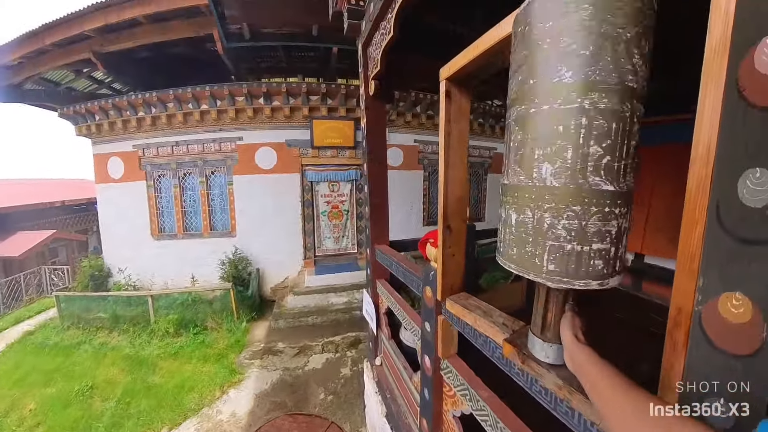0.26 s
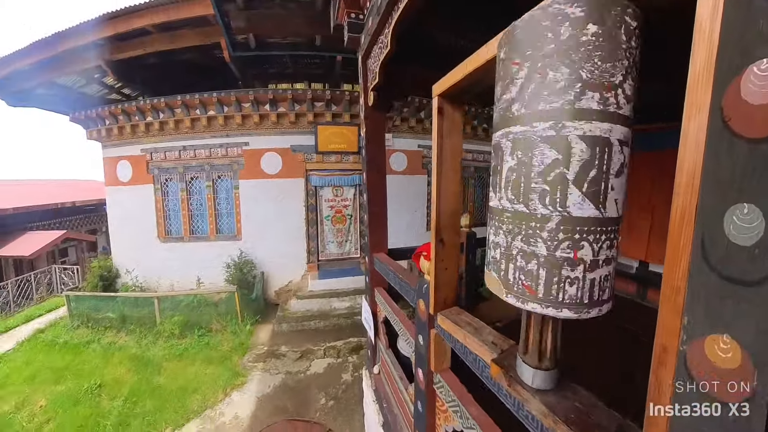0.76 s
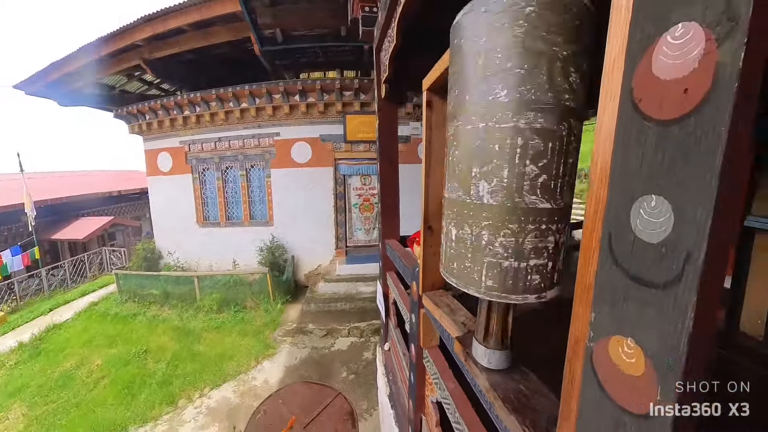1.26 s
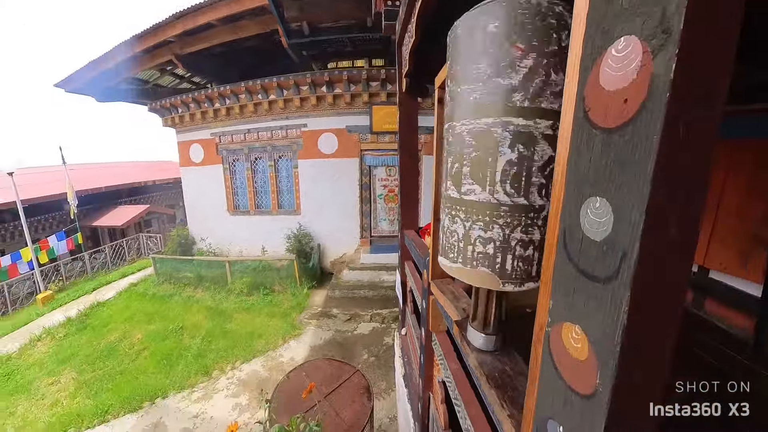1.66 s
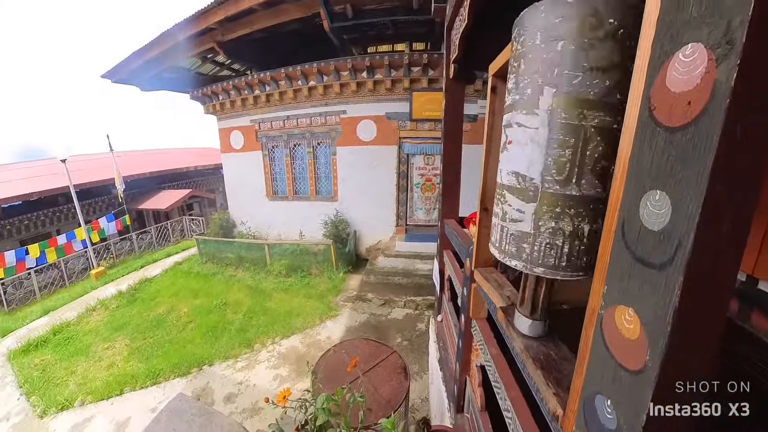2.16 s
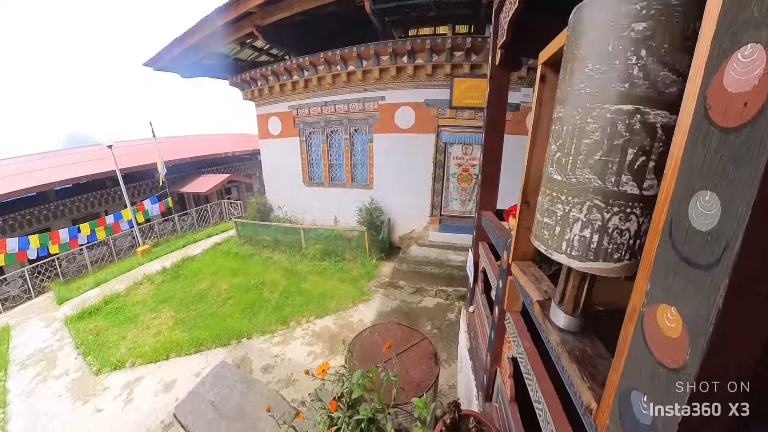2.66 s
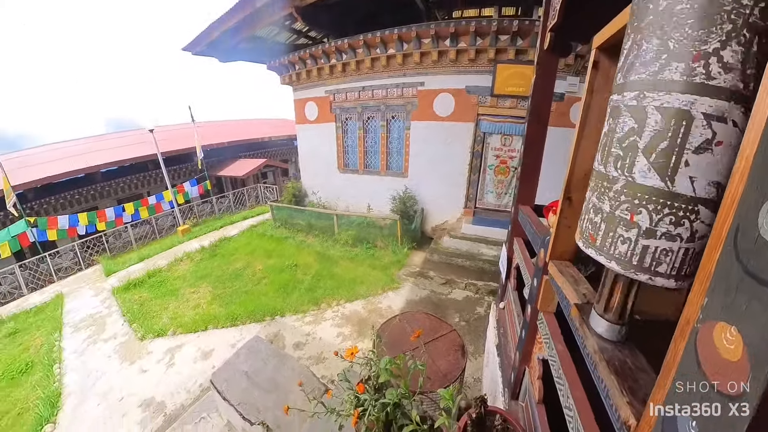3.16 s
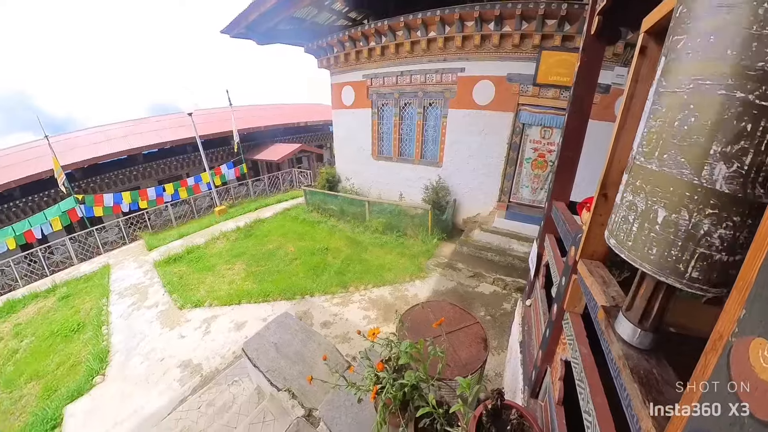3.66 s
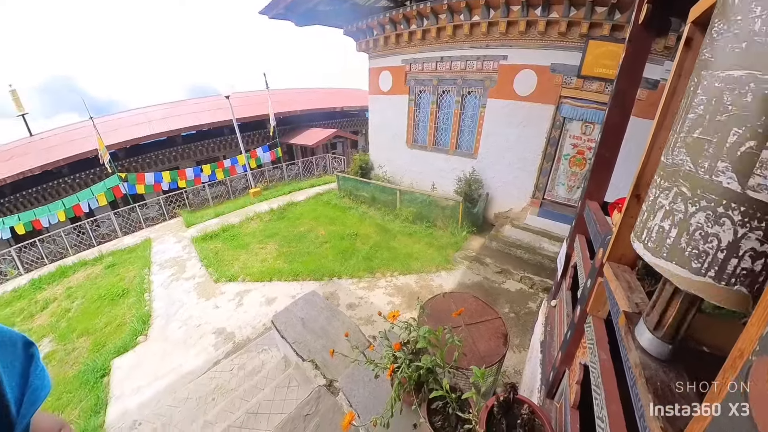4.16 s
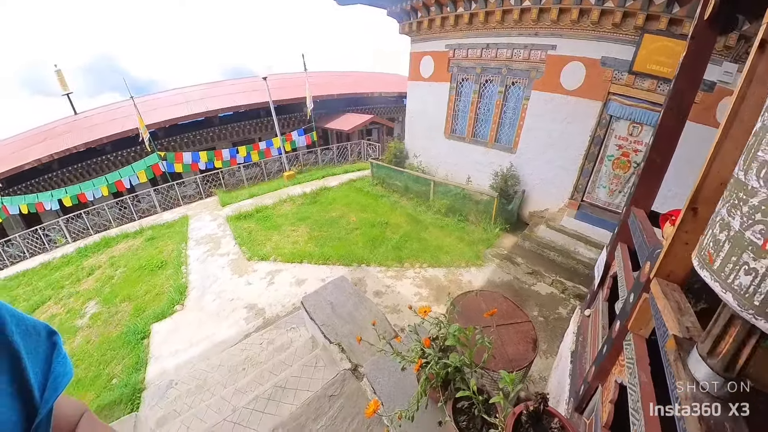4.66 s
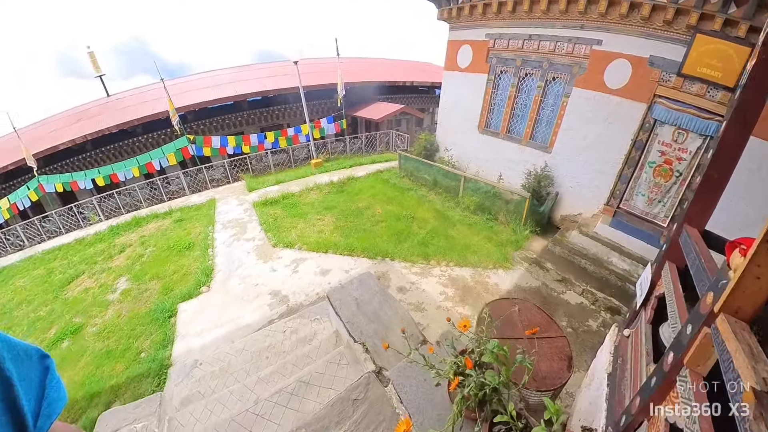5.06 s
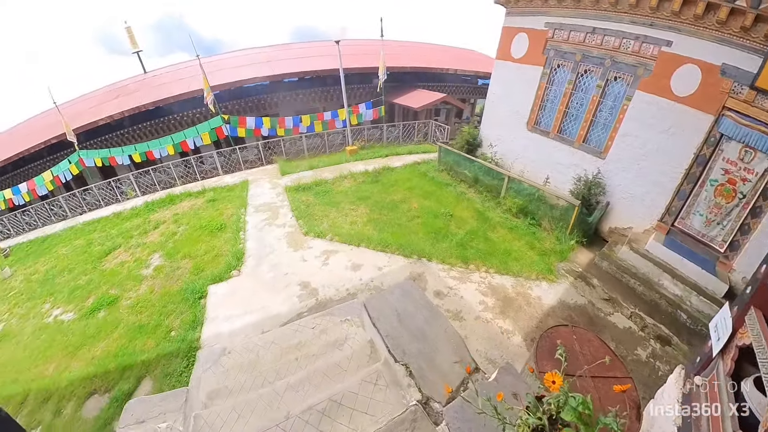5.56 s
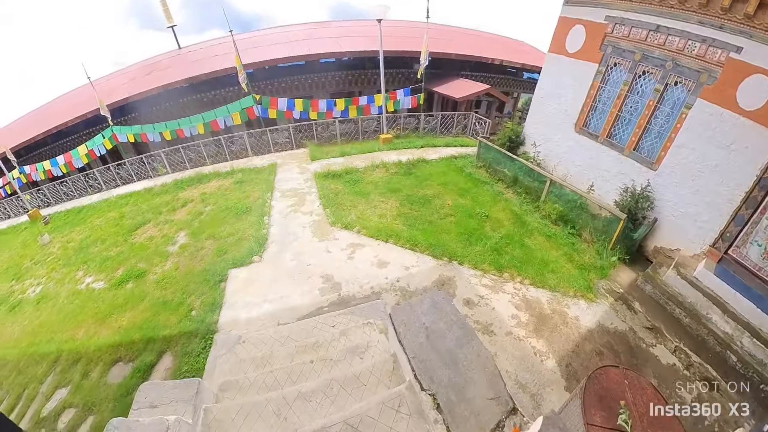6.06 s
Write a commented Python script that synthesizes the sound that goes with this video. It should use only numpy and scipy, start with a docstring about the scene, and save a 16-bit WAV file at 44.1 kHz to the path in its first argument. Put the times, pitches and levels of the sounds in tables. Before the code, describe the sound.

A big prayer wheel rotates in a wooden frame under a porch. Its spindle grumbles quietly while uneven hollow knocks, small hard clicks and soft hand-brushing come close to the microphone. A low thud sounds around halfway, then after a sparser pause a much louder wooden thud booms through the boards, followed by faint grinding and a few light ticks. Short porch echo, very faint outdoor air, nearly mono.

```python
"""Heavy prayer wheel on a porch

A heavy prayer wheel turns on its spindle in a wooden frame under a temple porch.
The spindle grumbles and knocks in its seat: small and large impacts make wood modes ring and die away.
A hand brushes the drum (filtered grains of noise), small parts click (short clusters of tones),
and two thuds boom through the boards. Echoes and faint outdoor air surround it, almost in mono."""
import sys
import numpy as np
from scipy import signal
from scipy.fft import rfft, irfft
from scipy.io import wavfile
from scipy.ndimage import uniform_filter1d

SR = 44100
rng = np.random.default_rng(int(sys.argv[2]) if len(sys.argv) > 2 else 0)


def generate_wav(sig):
    """Save sig (samples, or channels by samples) to the path in sys.argv[1] as 16-bit PCM at SR."""
    pcm = np.round(np.clip(np.atleast_2d(sig).T, -1, 1) * 32767).astype(np.int16)
    wavfile.write(sys.argv[1], SR, pcm)


N = 278712  # length in samples

# Spindle grinding in its seat: t/s, low wood modes level/dB, their centre f/Hz, upper wood modes level/dB
GRIND = [(0.0, -48.5, 265, -57), (0.25, -63, 270, -63.5), (0.45, -52, 235, -64), (0.66, -50, 310, -49.5),
         (0.94, -50.5, 220, -61), (1.17, -65.5, 320, -75), (1.3, -48, 215, -56.5), (1.75, -50, 250, -66),
         (1.95, -55, 210, -59), (2.34, -56, 310, -59), (2.56, -54.5, 245, -67.5), (2.75, -56, 285, -75.5),
         (3.11, -53, 245, -56.5), (3.4, -53, 290, -67.5), (3.53, -65, 300, -90), (3.76, -56.5, 215, -58),
         (3.92, -64.5, 270, -71.5), (4.0, -53.5, 260, -65.5), (4.2, -57, 215, -73.5), (4.55, -60, 310, -65),
         (5.0, -51, 190, -73.5), (5.15, -65.5, 230, -74.5), (5.42, -54, 215, -78.5),
         (5.58, -54.5, 330, -80), (5.7, -71, 225, -79), (5.9, -60, 240, -83), (6.1, -66, 370, -62.5),
         (6.21, -70, 380, -53.5), (6.32, -57, 300, -97)]
# Deep shudders of the boards: peak t/s, level/dB
SHUDDERS = [(0.62, -70), (0.86, -57), (1.46, -59), (1.77, -78), (2.5, -75), (3.24, -46), (3.7, -53),
            (4.11, -64), (4.68, -35), (5.0, -56.5), (5.32, -65)]
# Blows on the wood: t/s, peak level of the wood tone/dB, centre f/Hz,
# crack level/dB and boom level/dB against the wood tone, level fed to the echo/dB against the whole blow
KNOCKS = [(0.261, -44.5, 700, -7, -20, 2.5), (0.342, -28, 510, -8.5, -10, -8),
          (0.632, -35, 510, -12, -31, -5), (0.66, -36, 610, -9.5, -40, 4), (0.696, -38, 505, -4, -28, -1),
          (0.762, -31, 290, -10.5, -23, -10.5), (1.061, -45, 533, -15.5, -28, 7),
          (1.091, -39, 610, -2.5, -29.5, -2), (1.151, -39.5, 450, -5.5, -24, -4.5),
          (1.449, -36, 405, -9, -50, -0.5), (1.619, -27.5, 660, -3.5, -37, -1.5),
          (1.73, -33.5, 550, -7.5, -14.5, 1.5), (1.777, -39, 756, -2.5, -19, -1),
          (2.166, -39.5, 615, -26, -27, -27), (2.184, -37, 610, -7, -39, -3.5),
          (2.492, -30.5, 720, -6, -13.5, -5.5), (2.936, -35.5, 415, -17.5, -26, -7),
          (3.156, -20.5, 260, -29, -6, 0.5), (3.168, -25.5, 206, -18.5, 2, 0),
          (3.215, -33.5, 304, -36, 2, 5), (3.434, -39.5, 437, -42, -10, -11),
          (3.464, -45.5, 680, -36, -30, -11), (3.557, -47.5, 940, -29, -10, 0.5),
          (3.617, -50, 660, -36, 3, 4), (3.747, -42.5, 320, -19, -27, -2),
          (3.813, -47.5, 960, -34, -39, 5.5), (4.068, -54, 350, -27, 9, 3.5),
          (4.363, -38, 474, -16, -25, -4), (4.593, -40, 620, -45, -16.5, 8),
          (4.621, -8.5, 332, -29.5, -9, -6.5), (4.6369, -10, 240, -11, -17.5, -4),
          (4.655, -18.5, 302, -9.5, -8, -10.5), (4.661, -16, 656, -12, -9, -3),
          (4.699, -20.5, 645, -25, -10, 0), (4.758, -22.5, 577, -31.5, -7.5, -3.5),
          (4.81, -29, 320, -33, -6, 1.5), (5.054, -50, 810, -18.5, -7.5, 3.5),
          (5.604, -32.5, 420, -25, -39.5, -10.5), (6.045, -37, 335, -30, -32, -10),
          (6.166, -37.5, 755, -33, -18, -3.5), (6.198, -37.5, 940, -3, -28, 2.5),
          (6.248, -35, 1020, -3.5, -23, -13.5)]
# Small hard clicks: t/s, peak level/dB, pitch f/Hz, ring t60/ms (time to fall by 60 dB)
CLICKS = [(0.2835, -43, 3660, 32), (0.7556, -47, 3830, 25), (1.072, -51, 4360, 27),
          (1.0915, -44.5, 9100, 8), (1.153, -47, 2070, 11), (1.781, -34, 1670, 4), (2.183, -47, 4140, 16),
          (2.353, -62.5, 2260, 48), (2.473, -63, 3040, 17), (2.4929, -29, 3170, 13),
          (2.4926, -41.5, 9200, 7.5), (2.9401, -53.5, 2020, 64), (3.07, -64, 10200, 11),
          (3.105, -58.5, 10100, 10), (3.717, -62, 1900, 59), (3.813, -62.5, 2730, 67),
          (4.3669, -58, 1990, 62), (4.64, -31, 5120, 8), (4.657, -32.5, 6170, 6), (5.4848, -42, 1970, 11.4),
          (5.606, -52, 4290, 25), (6.21, -39.5, 2610, 14), (6.251, -50, 4000, 21)]
# Brushing strokes: peak t/s, length/s, fine hiss level/dB, coarser scrape level/dB
STROKES = [(0.053, 0.15, -64, -70), (0.308, 0.19, -63.5, -69), (0.717, 0.29, -65, -63),
           (1.167, 0.17, -71, -70.5), (1.465, 0.12, -79, -71), (1.772, 0.12, -72.5, -60.5),
           (1.97, 0.14, -63, -67), (2.23, 0.24, -69, -74.5), (2.512, 0.092, -70.5, -71),
           (3.52, 0.21, -100, -76.5), (3.729, 0.033, -74.5, -78), (5.625, 0.059, -84, -69.5),
           (6.014, 0.17, -75, -83), (6.24, 0.12, -90, -59)]
# Ringing modes of the wooden frame: f/Hz, relative level/dB (blows only), t60/s before extra damping
WOOD = [(179.7, 1, 0.074), (206, -7, 0.13), (272.9, -22.5, 0.12), (325, 4, 0.073), (438.4, 5.5, 0.067),
        (507.8, 9.5, 0.051), (581, 5, 0.019), (620.7, 5, 0.083), (700.3, 0, 0.11), (816.6, -1, 0.061),
        (948.4, 0, 0.078), (1100, -1, 0.077), (1225, -1, 0.068), (1387, -5.5, 0.049), (1815, -8, 0.043),
        (1984, -10, 0.041)]
# Ringing modes of the floor boards: f/Hz, relative level/dB (blows only), t60/s before extra damping
BOARDS = [(41.3, -11, 0.067), (59, 1.5, 0.056), (82, 3, 0.098), (107, 3, 0.28), (149.3, 4, 0.35)]
# Spectrum of cracks and of wooden drag: f/Hz, relative level/dB per Hz
CRACK = [(880, -25), (1500, -4), (2000, -4), (3450, -8.5), (6040, -11.5), (7280, -17), (10700, -19),
         (14000, -47)]
# Spectrum of the fine brushing hiss: f/Hz, relative level/dB per Hz
FINE = [(3820, -32), (6500, -10), (7420, -7), (8520, -4), (10200, 1.5), (11100, -3), (12400, -33),
        (16100, -60), (22000, -120)]
# Spectrum of the coarser brushing scrape: f/Hz, relative level/dB per Hz
COARSE = [(760, -63), (1300, -1), (1830, -2), (3120, -13.5), (4310, 2), (5070, -11.5), (9000, -23.5),
          (11700, -65), (19800, -120)]
# How fast the porch echo dies: f/Hz, t60/s before any quickening
PORCH = [(60, 0.079), (250, 0.4), (700, 0.17), (2000, 0.28), (5000, 0.16), (11000, 0.17)]
# How much of the scattered echo goes to the sides: f/Hz, gain/dB
WIDTH = [(1200, -93.5), (2400, -35.5), (4000, -8.5), (8000, -5.5), (13000, -27.5)]
# Spectrum of the outdoor air: f/Hz, relative level/dB per Hz
AIR = [(15, -38), (25, -26), (91, -22.5), (225, 5), (569, -12.5), (632, -13.5), (1680, -25), (4370, -21.5),
       (8690, -27), (10500, -29.5), (14000, -52)]

GRIND_DULL_DB = 14  # fall of the upper grinding modes per octave from their centre
SHUDDER_RISE_DB_PER_S, SHUDDER_FALL_DB_PER_S, SHUDDER_REST_DB = 233, 95.5, -81.5
FOCUS_DB, FOCUS_GROWTH_DB = 8.5, 4  # fall per octave for a blow at 500 Hz; growth per octave higher
ABOVE_DB = 1  # extra fall per octave above the centre of a blow
RATTLE_MS = 3.73
STROKE_RISE, STROKE_ENDS_DB = 0.52, -8  # share of a stroke spent swelling; level at its ends
DRAG_DB, DRAG_GROWTH = -5, 1  # drag against a scrape at -64 dB; extra dB per dB of a harder stroke
AIR_DB = -69
EDGE_HZ = 14400  # upper band limit


def grind():
    """Rough contact sets each mode ringing with its own train of small impacts; the boards shudder below."""
    low_db, low_hz, high_db = curves(GRIND)
    wood = rubbed(WOOD)
    boards = rubbed(BOARDS[:2])
    low = np.transpose(WOOD)[0] < 470
    out = shudder() * evened(boards.sum(0))
    groups = ((low, low_db, low_hz, 14.), (~low, high_db, 625., GRIND_DULL_DB))
    for part, db, centre_hz, slope_db in groups:
        weight = near(WOOD, centre_hz, slope_db)[part]
        tone = (wood[part] * weight).sum(0) / np.linalg.norm(weight, axis=0)
        out = out + gain_of(db) * tone
    return out


def rubbed(modes):
    """Many small random impacts keep each mode ringing; every mode is evened to the same level."""
    t = np.arange(SR // 4) / SR
    soft = 1 - np.exp(-(t / 0.005) ** 2)  # padded impacts keep each mode narrow
    sounds = []
    for mode in ring(modes, t, np.zeros(len(modes)), damping=1.93):
        impacts = grains(per_s=250., spread_db=4.5)
        sounds.append(evened(signal.oaconvolve(impacts, mode * soft)[:N]))
    return np.array(sounds)


def shudder():
    """Each shudder swells quickly and dies slowly over a faint rest level."""
    t, level = np.arange(N) / SR, gain_of(SHUDDER_REST_DB)
    for s, db in SHUDDERS:
        rise_db = (s - t) * SHUDDER_RISE_DB_PER_S
        fall_db = (t - s) * SHUDDER_FALL_DB_PER_S
        level = level + gain_of(db - np.maximum(rise_db, fall_db))
    return level


def knock(hz, crack_db, boom_db, chances, noise):
    """The blow favours modes near its centre; a tick and a rattle on top, the upper board modes below."""
    t = np.arange(SR // 2) / SR
    focus_db = FOCUS_DB + FOCUS_GROWTH_DB * np.log2(hz / 500)  # higher blows are more focused
    above = np.transpose(WOOD)[0][:, None] > hz
    weight = near(WOOD, hz, max(focus_db, 0) + ABOVE_DB * above)
    # each mode sounds as three randomly detuned copies, for a denser tone
    wood = sum((weight * ring(WOOD, t, c, damping=1.42)).sum(0) for c in chances)
    boom = sum(ring(BOARDS[2:], t, c, damping=1.87).sum(0) for c in chances)
    contact = 1 - np.exp(-(t / 0.0038) ** 2)  # the force builds up as the parts meet
    boom *= 1 - np.exp(-t / 0.004)  # the bass swells in too
    u = t * 1000 / RATTLE_MS
    tick = 10.5 * np.exp(-t / 0.0014)
    rattle = np.sqrt(u) * np.exp(-u)  # loose parts rattle on after the tick
    crack = np.resize(noise, len(t)) * (rattle + tick)
    parts = ((0, wood * contact), (boom_db, boom), (crack_db, crack * contact ** 2))
    return sum(gain_of(db) * x / abs(x).max() for db, x in parts)


def brush():
    """Dense fine and coarse grains of hiss, patchy in level; hard strokes also drag on the wood."""
    fine = coloured(grains(per_s=34000.0, spread_db=4.0), FINE)
    fine = patchy(fine, patch_db=4.8, bins=4, frames=30)
    coarse = coloured(grains(per_s=2700.0, spread_db=-1.5), COARSE)
    coarse = patchy(coarse, patch_db=3.5, bins=2, frames=50)
    drag = coloured(grains(per_s=760.0, spread_db=3.0), CRACK)
    drag = patchy(drag, patch_db=2.0, bins=3, frames=30)
    t, out = np.arange(N) / SR, np.zeros(N)
    for s, length, fine_db, coarse_db in STROKES:
        # distance from the peak: 0 at the peak, 1 at either end of the stroke
        away = np.maximum((s - t) / STROKE_RISE, (t - s) / (1 - STROKE_RISE)) / length
        swell = gain_of(STROKE_ENDS_DB * away ** 2.06)
        hard = gain_of(DRAG_DB + DRAG_GROWTH * (coarse_db + 64))
        scrape = gain_of(coarse_db) * (coarse + hard * drag)
        out += swell * (gain_of(fine_db) * fine + scrape)
    return out


def click(hz, t60_ms, chance):
    """A small hard part rings as a cluster of short modes close in pitch."""
    t = np.arange(SR // 10) / SR
    cluster = np.sin(2 * np.pi * hz * (1 + 0.064 * chance[:, None]) * t).sum(0)
    onset = 1 - np.exp(-t / 0.00068)
    sound = cluster * gain_of(-60000 * t / max(t60_ms, 4)) * onset
    return sound / abs(sound).max()


def porch(x, quick=1.):
    """Sparse echoes of random sign, each band dying at its own speed; three tails take turns."""
    at = np.arange(200, SR - 20, 20) + rng.integers(0, 20, (3, (SR - 201) // 20))
    taps = np.zeros((3, SR))
    np.put_along_axis(taps, at, rng.choice([-1., 1.], at.shape), 1)
    hz, t, z = signal.stft(taps, SR, nperseg=512)
    fade = gain_of(-60 * quick * t / read(PORCH, hz)[:, None])
    tails = signal.istft(z * fade, SR, nperseg=512)[1]
    tails = tails / np.linalg.norm(tails, axis=1)[:, None]
    turn = 2 * np.pi * (np.arange(N) / SR * 2.3 + np.arange(3)[:, None] / 3)  # 2.3 rounds per second
    fed = x * np.sqrt((1 + np.cos(turn)) / 3)
    return signal.fftconvolve(fed, tails, axes=1)[:, :N].sum(0)


def air():
    """Faint outdoor floor: filtered noise in drifting patches."""
    noise = coloured(rng.standard_normal(N), AIR)
    return gain_of(AIR_DB) * patchy(noise, patch_db=3.0, bins=2, frames=25)


def ring(modes, t, chance, damping):
    """Dying modes, one row each; chance shifts each pitch a little, damping shortens each ring."""
    hz, db, t60 = np.transpose(modes)[:, :, None]
    shift = 1 + 0.05 * chance[:len(modes), None]
    return gain_of(db - 60 * t * damping / t60) * np.sin(2 * np.pi * hz * shift * t)


def near(modes, hz, db_per_octave):
    """Weights that favour the modes close to the pitch hz."""
    octaves = abs(np.log2(np.transpose(modes)[0][:, None] / hz))
    return gain_of(-db_per_octave * octaves)


def grains(per_s, spread_db):
    """Random tiny impacts; a few stand out as larger, or as smaller if the spread is negative."""
    hit, size, sign = rng.random((N, 3)).T
    strength = gain_of(spread_db * np.minimum(-np.log(size + 1e-9), 4))
    return (hit < per_s / SR) * strength * np.sign(sign - .5)


def patchy(x, patch_db, bins, frames):
    """Random patches of level over time and frequency, scaled to rms 1."""
    z = signal.stft(x, nperseg=256, noverlap=192)[2]
    field = rng.standard_normal(z.shape[::-1]).T
    field = uniform_filter1d(field, size=bins, axis=0)
    field = evened(uniform_filter1d(field, size=frames, axis=1))
    return evened(signal.istft(z * gain_of(patch_db * field), nperseg=256, noverlap=192)[1][:len(x)])


def coloured(x, points):
    """Filters by a spectrum, then scales to rms 1."""
    hz = np.fft.rfftfreq(len(x), 1 / SR)
    return evened(irfft(rfft(x) * gain_of(read(points, hz)), len(x)))


def read(points, hz):
    """Reads a spectrum on a log-frequency axis."""
    f, value = np.transpose(points)
    return np.interp(np.log(hz + 1), np.log(f + 1), value)


def curves(rows):
    """Columns of a curve table at every sample."""
    s, *columns = np.transpose(rows)
    return [np.interp(np.arange(N) / SR, s, c) for c in columns]


def gain_of(db):
    """Decibels to a factor."""
    return 10 ** (np.asarray(db) / 20)


def evened(x):
    """Scales to rms 1 (an average level of one)."""
    return x / np.sqrt(np.mean(x ** 2) + 1e-20)


def add(mix, s, sound):
    """Mixes a sound in at time s in seconds."""
    part = mix[round(s * SR):][:len(sound)]
    part += sound[:len(part)]


def scene():
    """Blows and clicks with echoes, grinding, brushing and air; the treble spreads a little to the sides."""
    direct, sent = np.zeros(N), np.zeros(N)  # sent feeds the echo
    chances = np.clip(rng.standard_normal((len(KNOCKS), 3, len(WOOD))), -2, 2)
    noises = rng.standard_normal((len(KNOCKS), 8192))
    for (s, db, *blow, echo_db), chance, noise in zip(KNOCKS, chances, noises):
        rattle = patchy(coloured(noise, CRACK), patch_db=0.5, bins=3, frames=30)
        sound = gain_of(db) * knock(*blow, chance, rattle)
        add(direct, s, sound)
        add(sent, s, gain_of(echo_db) * sound)
    click_chances = rng.uniform(-0.84, 1, (len(CLICKS), 5))
    for (s, db, hz, t60_ms), chance in zip(CLICKS, click_chances):
        sound = gain_of(db) * click(hz, t60_ms, chance)
        add(direct, s, sound)
        add(sent, s, gain_of(-16.0) * sound)
    mid = direct + porch(sent) + grind() + brush() + air()
    side = porch(mid, quick=2.1)  # close walls scatter the treble unevenly to the two sides
    side_gain = gain_of(read(WIDTH, np.fft.rfftfreq(N, 1 / SR)))
    side = irfft(rfft(side) * side_gain, N)
    return np.array([mid + side, mid - side])


def record(dry):
    """The microphone rolls off the deepest bass; then a steep filter cuts the highest treble."""
    bass_cut = signal.butter(3, 25.2, "high", fs=SR, output="sos")  # corner in Hz
    thin = signal.sosfilt(bass_cut, dry)
    treble_cut = signal.firwin(511, EDGE_HZ, window=("kaiser", 9), fs=SR)
    return signal.oaconvolve(thin, treble_cut[None], "same")


dry = scene()
out = record(dry)
generate_wav(out)
```